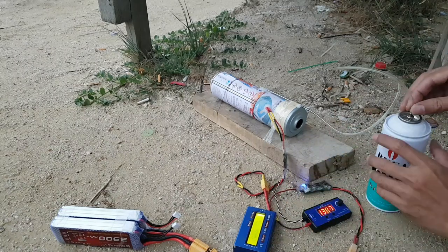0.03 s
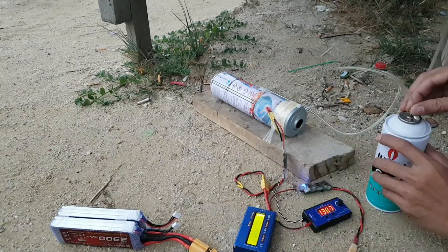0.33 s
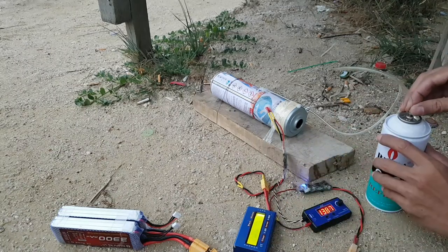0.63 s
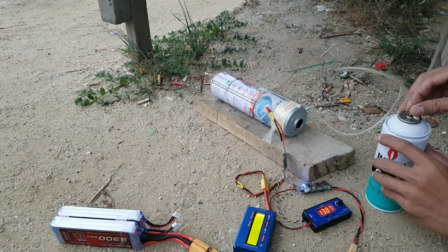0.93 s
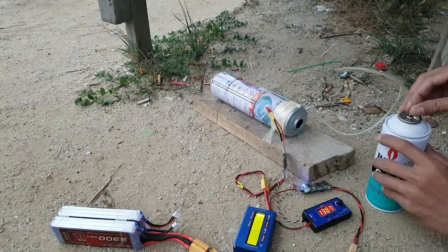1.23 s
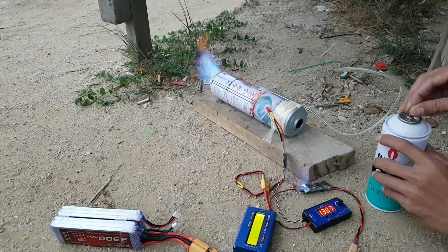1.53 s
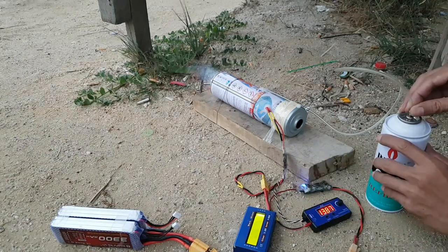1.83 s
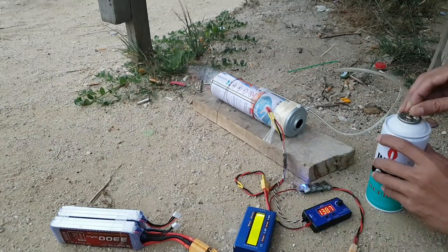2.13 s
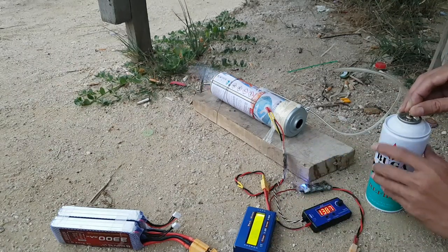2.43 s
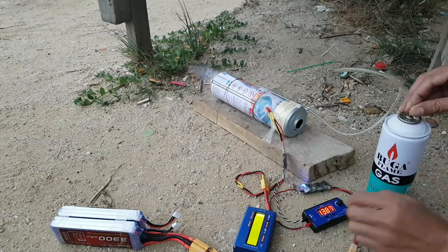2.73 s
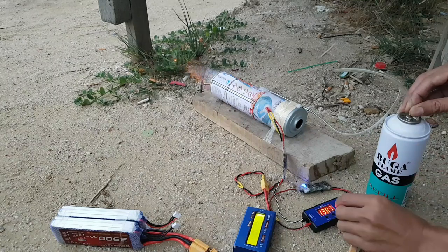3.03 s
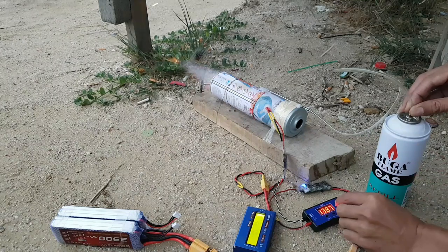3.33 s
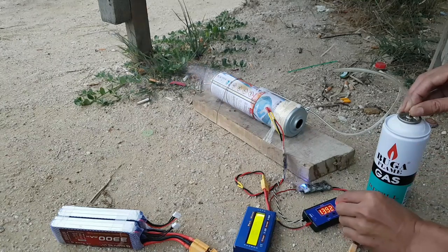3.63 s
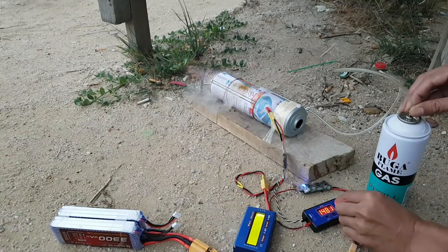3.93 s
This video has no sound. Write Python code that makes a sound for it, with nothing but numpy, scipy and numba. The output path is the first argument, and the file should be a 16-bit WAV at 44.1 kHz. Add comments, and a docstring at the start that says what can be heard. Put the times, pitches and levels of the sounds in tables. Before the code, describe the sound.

A small homemade jet engine runs close by outdoors. Its electric fan whines and blows, gas starts hissing in, then it ignites with a sharp thump and burns with a loud, hollow, fluttering roar.

```python
"""A small jet engine made from a can roars on the ground outdoors, about a metre away.
Gas hisses in, catches with a thump and burns on; the fluttering flame rings the tube.
Its electric fan whines and blows throughout, and the whine rises at the end as the shaft speeds up.
Wind pops the left microphone port twice; gain control ducks under the roar."""
import sys
import numpy as np
from scipy import signal
from scipy.fft import rfft, irfft
from scipy.io import wavfile
from scipy.ndimage import uniform_filter1d
from numba import njit

SR = 44100
rng = np.random.default_rng(int(sys.argv[2]) if len(sys.argv) > 2 else 0)


def generate_wav(sig):
    """Save sig (samples, or channels by samples) to the path in sys.argv[1] as 16-bit PCM at SR."""
    pcm = np.round(np.clip(np.atleast_2d(sig).T, -1, 1) * 32767).astype(np.int16)
    wavfile.write(sys.argv[1], SR, pcm)


N = 176400
T = np.arange(N) / SR
F = np.maximum(np.fft.rfftfreq(N, 1 / SR), 1)

AIR_ALIKE_HZ, FLAME_ALIKE_HZ = 1410, 1480  # channels decorrelate above
AIR_DIRECT, FAN_LEAD_S = 0.19, -0.000062


def undb(db):
    return 10 ** (np.asarray(db) / 20)


def curve(rows):
    """Linear interpolation over time."""
    return np.interp(T, *np.array(rows).T)


def colour(rows):
    """Spectral gain from freq_hz, gain_db points."""
    hz, db = np.array(rows).T
    return undb(np.interp(np.log(F), np.log(hz), db))


def resonances(rows):
    """Spectral gain of steep resonances, summed in power."""
    peaks = (undb(db) / (1 + ((F - hz) / (0.44 * width_hz)) ** 2) for hz, width_hz, db in rows)
    return np.sqrt(sum(peak ** 2 for peak in peaks))


def pan(db):
    """Stereo gains from left minus right dB."""
    return undb(np.array([[.5], [-.5]]) * db)


def noise(gain, alike_hz, direct=0, lead_s=0):
    """Unit-rms stereo turbulence: bass and a direct share are coherent; left leads by lead_s."""
    alike = direct + (1 - direct) / (1 + (F / alike_hz) ** 2.1)
    mid, side = rfft(rng.standard_normal((2, N)))
    sign = np.array([[1], [-1]])
    spectrum = mid * np.sqrt(1 + alike) + sign * side * np.sqrt(1 - alike)
    lead = np.exp(1j * np.pi * F * lead_s * sign)
    y = irfft(gain * lead * spectrum, N)
    return y / y.std()


def walk(rate_hz):
    """Random drift, unit variance."""
    y = irfft(rfft(rng.standard_normal(N)) / (1 + (F / rate_hz) ** 4), N)
    return (y - y.mean()) / y.std()


@njit
def follow(x, attack_s, release_s):
    """Envelope follower."""
    out, level = np.empty(len(x)), 0.
    for i in range(len(x)):
        level += (x[i] - level) / (SR * (attack_s if x[i] > level else release_s))
        out[i] = level
    return out


def wind():
    """Light breeze and two pressure pops on the left port."""
    # start_s, relative_db
    hits = [(0.7345, -4), (1.0186, -8.5)]
    # freq_hz, gain_db
    spectrum = [(70, -13.5), (500, -23.5), (3000, -26.5)]
    # time_s, level_db
    levels = [(0, -43.5), (.7, -40), (1.15, -42)]
    rise_s, fall_s = 0.0002, 0.0013
    pressure = 0
    for start_s, db in hits:
        age_s = np.maximum(T - start_s, 0)
        pressure += undb(db + 8) * (1 - np.exp(-age_s / rise_s)) * np.exp(-age_s / fall_s)
    pops = signal.sosfilt(signal.butter(2, 63, "high", fs=SR, output="sos"), pressure)
    breeze = noise(colour(spectrum), AIR_ALIKE_HZ)[0] * undb(curve(levels) + 2 * walk(9.6))
    return np.array([pops + breeze, np.zeros(N)])


def airflow():
    """Air rushes through the fan and rings the intake."""
    # freq_hz, gain_db
    spectrum = [(30, -19.5), (350, -4), (600, -13.5), (900, -19), (1350, -17), (1800, -12), (3100, -14.5),
                (4300, -21), (6700, -16.5), (9200, -31.5), (10600, -17.5), (14500, -24)]
    # freq_hz, left_minus_right_db
    balance = [(1200, -1), (2300, -3), (5500, -14.5), (7500, -1)]
    # time_s, level_db
    levels = [(0, -33), (4, -33.5)]
    # freq_hz, width_hz, gain_db
    intake_modes = [(1600, 200, -11), (2637, 340, -2.5), (3730, 480, -0.5), (4750, 370, -4.5)]
    stereo_gain = colour(spectrum) * colour(balance) ** np.array([[.5], [-.5]])
    rush = noise(stereo_gain, AIR_ALIKE_HZ, AIR_DIRECT, FAN_LEAD_S) * undb(curve(levels))
    intake = noise(resonances(intake_modes), AIR_ALIKE_HZ, direct=0.73, lead_s=FAN_LEAD_S)
    return rush + intake * pan(-6) * undb(-36.5 + 1.3 * walk(25))


def fan():
    """Shaft and motor partials; the higher ones flicker more in the moving air."""
    # time_s, shaft_hz
    speed = [(0, 529.4), (1.3, 529.2), (3.75, 530.7), (3.82, 551), (3.94, 625), (4, 659)]
    # shaft_multiple
    orders = [1, 2, 3.095, 3.906, 5.905, 7, 10, 12]
    # level_db per order
    order_db = [-33.5, -47, -57, -46, -46.5, -48.5, -52, -45]
    # left_minus_right_db per order
    order_pan_db = [-1.5, -5.5, 21, -2.5, 2, -5, -4, -11.5]
    # time_s, level_db
    whine = [(0, -34), (.5, -37.5), (.8, -44.5), (1.1, -49), (1.3, -40.5), (1.68, -37.5), (4, -38.5)]
    # time_s, level_db
    blade = [(0, -46.5), (2.3, -52), (2.9, -44), (3.72, -39), (3.86, -60)]
    # time_s, level_db
    whistle = [(0, -42), (.8, -43), (1.02, -38), (1.45, -45), (2.2, -48), (2.9, -42), (3.72, -44), (4, -35)]
    shaft_hz = curve(speed) * (1 + 0.00056 * walk(12))
    phase = 2 * np.pi * (np.cumsum(shaft_hz) / SR + shaft_hz * FAN_LEAD_S * np.array([[.5], [-.5]]))
    partials = list(zip(orders, order_db, order_pan_db))
    partials += [(4.906, curve(whine), -5), (8, curve(blade), -5), (21, curve(whistle), -4)]
    out = 0
    for order, db, pan_db in partials:
        flicker_db = 1.5 * min(order / 4, 1) * np.array([walk(13), walk(36)])
        tone = np.sqrt(2) * np.sin(order * phase + rng.uniform(0, 2 * np.pi))
        out += tone * undb(db + flicker_db) * pan(pan_db)
    return out


def gas_jet():
    """Gas hisses into the engine."""
    # freq_hz, gain_db
    spectrum = [(3000, -11.5), (6000, -1), (7000, 4), (8200, -9), (9300, -35), (10500, -17.5), (12700, -3),
                (14500, -13.5)]
    # time_s, level_db
    levels = [(1.1, -46), (1.4, -35), (1.68, -31.5), (1.72, -30.5), (2.2, -37.5), (2.5, -33.5),
              (3.05, -30.5), (4, -30)]
    hiss = noise(colour(spectrum), AIR_ALIKE_HZ, AIR_DIRECT, FAN_LEAD_S)
    return hiss * undb(curve(levels) + 1.7 * walk(15))


def ignition():
    """A flame swells in the tube, then the mixture goes off in two cracks and a thump."""
    # freq_hz, gain_db
    kindle_spectrum = [(60, -6), (320, 1), (1000, -14.5), (2000, -32.5)]
    # time_s, level_db
    kindle_levels = [(1.45, -57), (1.53, -37), (1.69, -17.5), (1.73, -59)]
    # freq_hz, gain_db
    crack_spectrum = [(60, -16), (300, 4.5), (1500, -1.5), (2800, -8), (4500, -14.5), (9300, -39)]
    # peak_s, level_db, rise_and_decay_s
    bursts = [(1.6864, -16.5, 0.0076), (1.697, -4.5, 0.0035)]
    # peak_s, pitch_hz, level_db, half_length_s
    thump = [(1.69, 322, -5.5, 0.0089), (1.696, 102, -10.5, 0.0083)]
    out = noise(colour(kindle_spectrum), FLAME_ALIKE_HZ) * undb(curve(kindle_levels))
    crack = noise(colour(crack_spectrum), alike_hz=5000)
    for peak_s, db, decay_s in bursts:
        out += crack * undb(db) * np.exp(-np.abs(T - peak_s) / decay_s)
    for peak_s, hz, db, half_s in thump:
        envelope = undb(db) * np.exp(-((T - peak_s) / half_s) ** 2)
        out += envelope * np.sin(2 * np.pi * hz * (T - peak_s))
    return out


def flame():
    """Fluttering combustion flares, rings the tube, surges and gains rumble as the gas opens."""
    # freq_hz, gain_db
    roar_spectrum = [(120, -32.5), (220, -6.5), (330, 0.5), (550, 2), (850, 0), (1050, -5.5), (1400, -17),
                     (2600, -24.5), (3200, -20.5), (4200, -39.5), (9000, -64.5)]
    # freq_hz, width_hz, gain_db
    tube_modes = [(349.4, 25, -10), (515, 39, -10.5), (622, 66, -8.5), (674.7, 40, 2), (721.3, 31, -2),
                  (795.7, 44, -2), (892.6, 31, -9.5), (967, 49, -11), (992, 19, -8), (1288, 32, -21),
                  (1576, 31, -26), (3137, 69, -31), (5590, 170, -40.5)]
    # cancellations between modes: freq_hz
    dips_hz = [760, 936, 1090, 1183, 1375, 1524, 1690]
    # tube surges and sags: centre_s, gain_db
    surges = [(2.262, 3.5), (2.32, -2.5), (2.402, -4.5), (2.482, 1.5), (2.67, -4), (2.799, 2), (3.095, 2.5),
              (3.366, 1.5), (3.432, -6)]
    # freq_hz, gain_db
    rumble_spectrum = [(40, -27), (90, -5.5), (180, 3), (320, -1.5), (700, -70)]
    # time_s, level_db
    rumble_levels = [(1.5, -62), (1.7, -27), (2.2, -27), (2.95, -17), (3.45, -16.5), (4, -16)]
    light_s, catch_s, flare_db, flare_s = 1.695, 0.019, 2, .25
    surge_half_s, dip_half_hz, dip_db = 0.023, 12.4, -7
    lit = np.clip((T - light_s) / catch_s, 0, 1)
    flare = undb(flare_db * np.exp(-np.abs(T - light_s) / flare_s))
    surge_db = sum(db * np.exp(-((T - centre_s) / surge_half_s) ** 2) for centre_s, db in surges)
    dips = undb(dip_db * sum(np.exp(-((F - hz) / dip_half_hz) ** 2) for hz in dips_hz))

    def burn(gain):
        return noise(gain * dips, FLAME_ALIKE_HZ, direct=0.34, lead_s=0.000008)

    roar = burn(colour(roar_spectrum)) * undb(-9.5 + .5 * walk(56))
    howl = burn(resonances(tube_modes))
    power = uniform_filter1d((howl ** 2).mean(axis=0), size=1500)
    howl *= (.5 + .5 * power) ** -0.23  # the tube's swing limits itself
    howl *= undb(-5 + surge_db)
    rumble = burn(colour(rumble_spectrum)) * undb(curve(rumble_levels) + 2.5 * walk(19))
    sputter = burn(resonances([(1990, 750, 0)])) * undb(-34.5 + 3.5 * walk(9))
    return lit * flare * (roar + howl + sputter) + rumble


def scene():
    return fan() + airflow() + gas_jet() + flame() + ignition() + wind()


def record(dry):
    """Treble notch of the ports, gain control, clipping, low-pass."""
    notch_hz, notch_half_hz, notch_db = 9330, 420, -6.5
    threshold_db, slope, cutoff_hz = -9.5, 0.8, 14500
    notch = undb(notch_db * np.exp(-((F - notch_hz) / notch_half_hz) ** 2))
    notched = irfft(rfft(dry) * notch, N)
    level = follow(np.abs(notched).mean(axis=0), attack_s=0.0055, release_s=.12)
    ducked = notched * np.maximum(level / undb(threshold_db), 1) ** -slope
    lowpass = signal.ellip(12, .2, 85, cutoff_hz, fs=SR, output="sos")
    return signal.sosfilt(lowpass, np.clip(ducked, -1, 1))


dry = scene()
out = record(dry)
generate_wav(out)
```